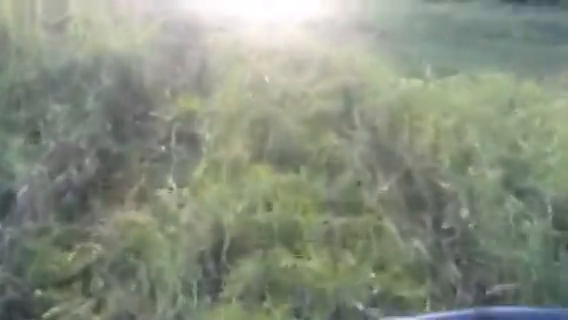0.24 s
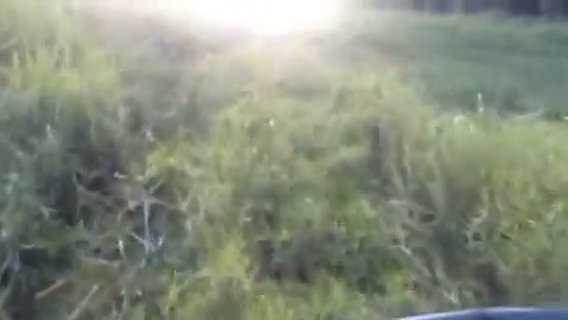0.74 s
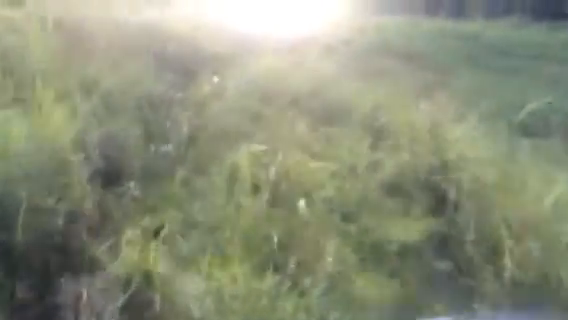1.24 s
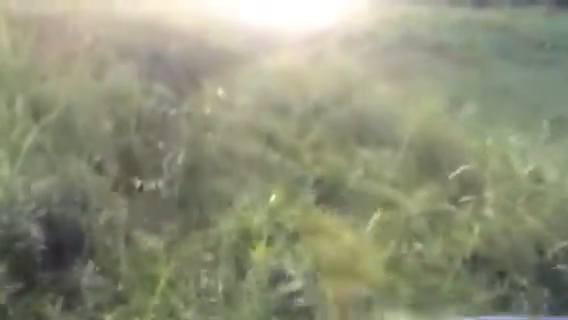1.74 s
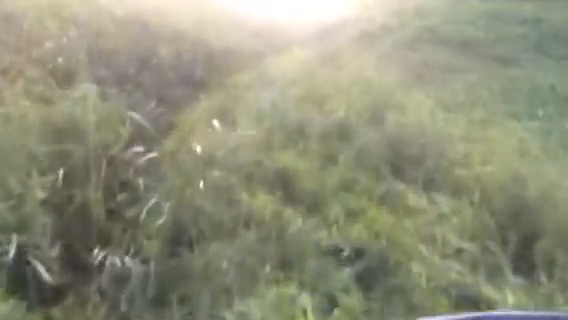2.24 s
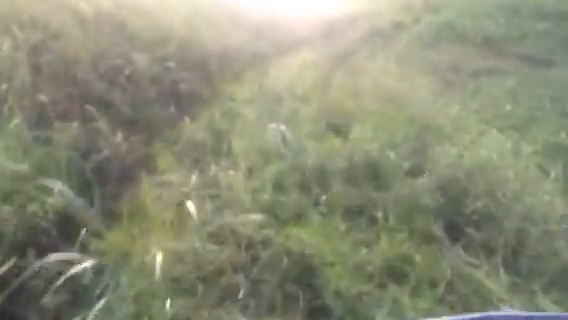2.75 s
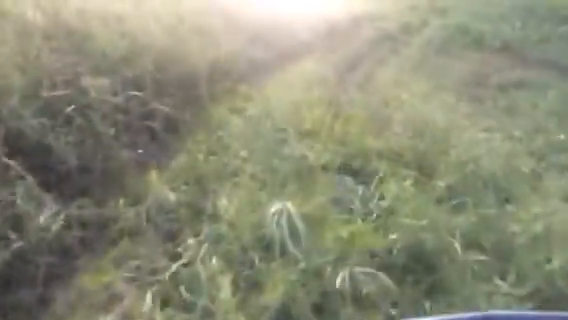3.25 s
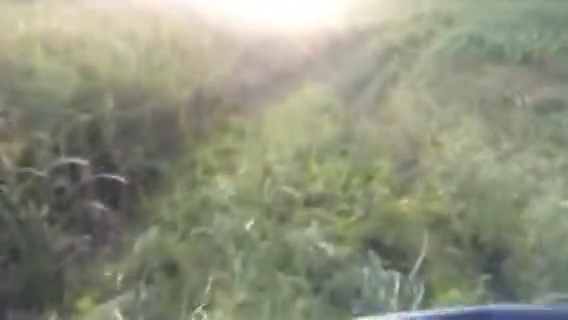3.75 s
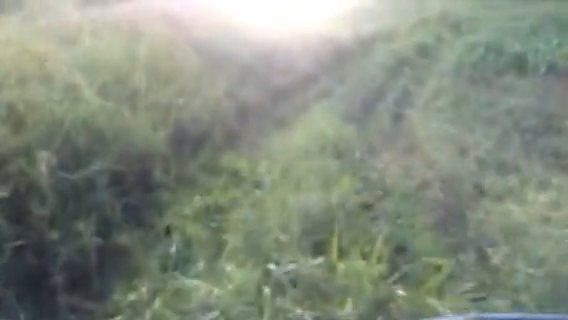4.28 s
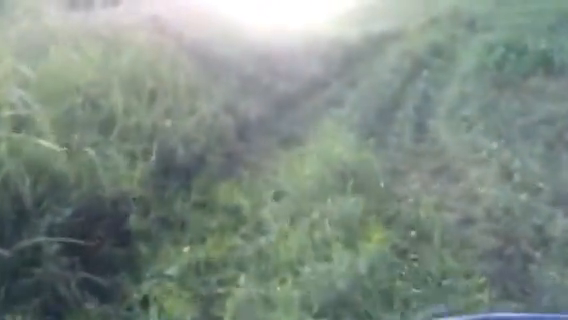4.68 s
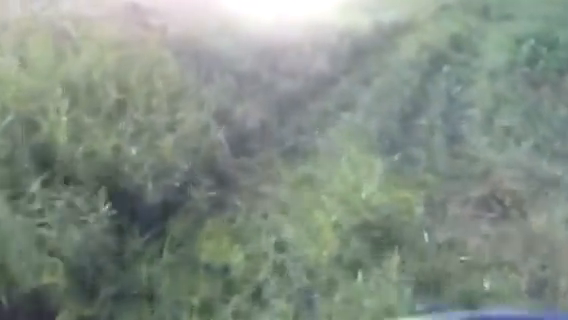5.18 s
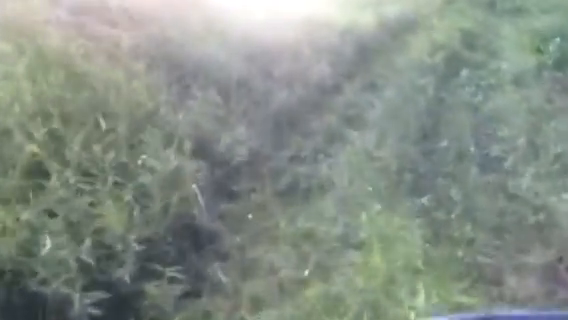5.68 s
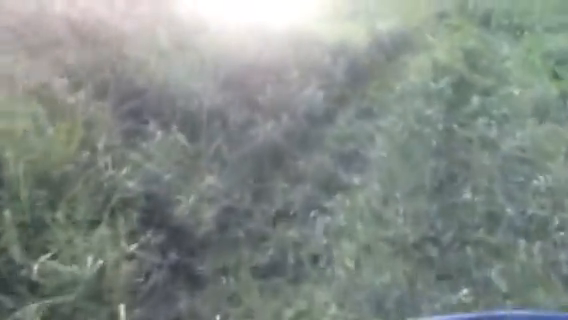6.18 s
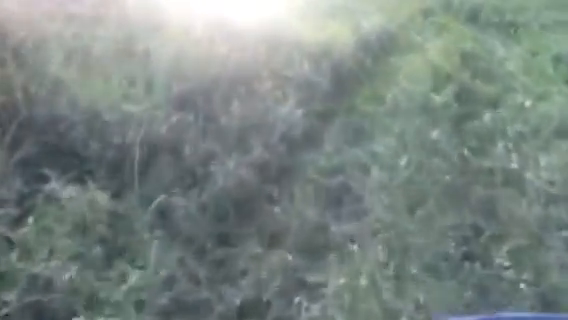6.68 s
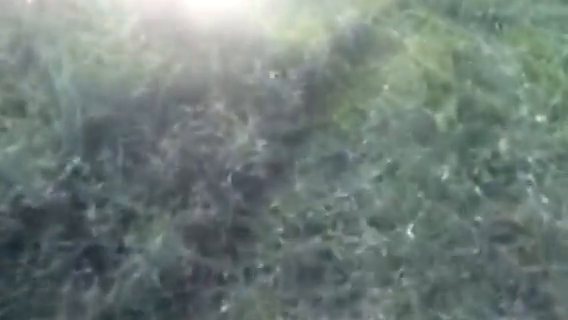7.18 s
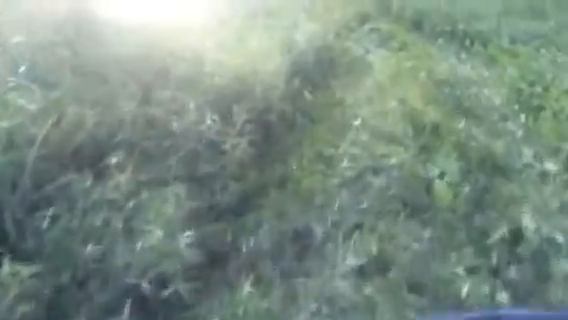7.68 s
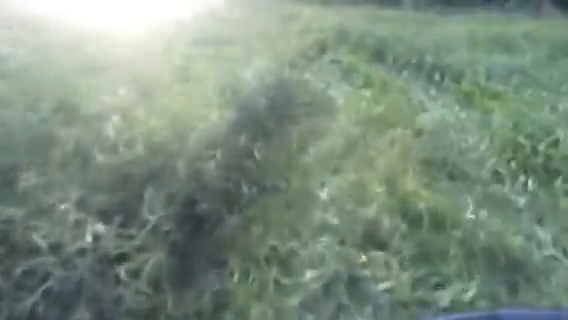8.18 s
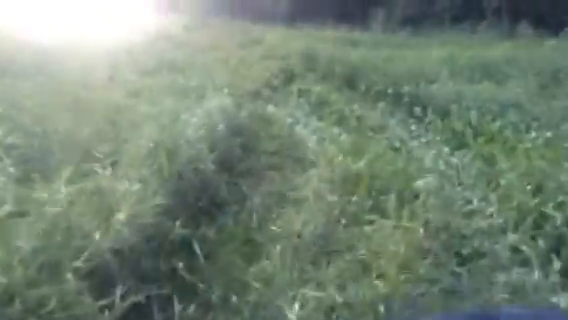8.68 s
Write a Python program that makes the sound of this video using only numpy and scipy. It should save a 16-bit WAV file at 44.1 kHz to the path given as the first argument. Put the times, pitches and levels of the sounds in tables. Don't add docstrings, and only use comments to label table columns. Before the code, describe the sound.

A single-cylinder off-road vehicle chugs steadily through tall grass, sagging briefly under load, with stalks hissing and snapping and one hard stone knock underneath.

```python
import sys
import numpy as np
from scipy import signal
from scipy.io import wavfile
from scipy.ndimage import uniform_filter1d

SR = 44100
rng = np.random.default_rng(int(sys.argv[2]) if len(sys.argv) > 2 else 0)


def unload_audio(sound):
    columns = np.transpose(np.atleast_2d(sound))
    steps = np.round(np.clip(columns, -1, 1) * 32767)
    wavfile.write(sys.argv[1], SR, steps.astype(np.int16))


def natural_amplitude(level_db):
    exponent = np.asarray(level_db, float) / 20
    return 10 ** exponent


N = 393813
T = np.arange(N) / SR


def evened(x):
    return x / np.sqrt(np.mean(x ** 2) + 1e-20)


def curves(rows, t=T):
    s, *columns = np.transpose(rows)
    return [np.interp(t, s, c) for c in columns]


def read(points, hz):
    f, value = np.transpose(points)
    return np.interp(np.log(hz + 1), np.log(f + 1), value)


def add(mix, s, sound):
    part = mix[round(s * SR):][:len(sound)]
    part += sound[:len(part)]


def resonate(x, hz, width_hz):
    r = np.exp(-np.pi * width_hz / SR)
    if np.ndim(hz) == 0:
        return 2 * signal.lfilter([1 - r], [1, -r * np.exp(2j * np.pi * hz / SR)], x).real
    turn = np.exp(2j * np.pi * np.cumsum(hz) / SR)
    return 2 * (turn * signal.lfilter([1 - r], [1, -r], x / turn)).real


def resonate_twice(x, hz, width_hz):
    return resonate(resonate(x, hz, width_hz), hz, width_hz)


def wander(rate_hz, count=1):
    steps = uniform_filter1d(rng.standard_normal((count, 2000)), max(int(110 / rate_hz), 1), axis=1)
    return [np.interp(T, np.linspace(0, T[-1], 2000), evened(s)) for s in steps]


def shaped_noise(spectrum, patchy_db, flicker_db, field_db=0):
    frames, hz = N // 256 + 5, np.fft.rfftfreq(1024, 1 / SR)
    a, b, patches = rng.standard_normal((frames, 513, 3)).T
    patches = uniform_filter1d(patches, size=14, axis=0)
    patches = evened(uniform_filter1d(patches, size=10, axis=1))
    flicker = evened(uniform_filter1d(rng.standard_normal(frames), size=4))
    level_db = read(spectrum, hz)[:, None] + patchy_db * patches + flicker_db * flicker + field_db
    z = (a + 1j * b) * natural_amplitude(level_db)
    return evened(signal.istft(z, nperseg=1024, noverlap=768)[1][512:N + 512])


# start_s, rate [firings per second]
ENGINE_SPEED = [(0.0, 19.227), (1.61, 19.08), (2.28, 18.789), (3.15, 18.068), (3.32, 16.192),
                (3.63, 17.321), (3.78, 16.51), (4.35, 16.617), (4.5, 17.038), (4.83, 16.748), (5.1, 17.918),
                (5.69, 17.665), (5.94, 18.938), (6.09, 18.568), (6.76, 18.822), (7.03, 19.787),
                (8.26, 19.347), (8.93, 19.357)]


def pace():
    return curves(ENGINE_SPEED)[0]


def crank():
    return np.cumsum(pace()) / SR


# order, free_running_db, lugging_db
ORDER_LEVELS = [(1, -59, -65.5), (2, -49, -55), (3, -53.5, -51), (4, -35, -42), (5, -22.5, -24.5),
                (6, -24, -26), (7, -36, -40), (8, -45, -31), (9, -43.5, -29.5), (10, -44.5, -34),
                (11, -48, -47.5), (12, -63, -43.5), (13, -66.5, -60.5), (14, -63.5, -50), (15, -57, -68.5),
                (16, -61, -71), (17, -59, -66.5), (18, -68.5, -58), (19, -55.5, -60.5)]
PACE, LOAD = (16.13, 19.41, 19.6), (1, -0.086, 0.038)
# order, lugging_db, cruising_db, pulling_away_db, sway_db
LOUD_ORDERS = [(4, -40.5, -35, -32, 1.7), (5, -28, -24.5, -25.5, -1.3), (6, -25.5, -22.5, -23, 0.14),
               (7, -41.5, -38.5, -34, 3.5), (8, -30.5, -49, -48, 2.1), (9, -31.5, -47.5, -42.5, 1.5),
               (11, -53, -48, -46, 3)]
# middle_s, half_length_s, loss_db
WEAK_FIRINGS = [
    (2.44, 0.045, -1.5),
    (3.24, 0.15, -6),
    (3.75, .07, -2.5),
    (6.066, .05, -0.5),
]
FIRING_TURNS, START_TURNS = -.05, .48
PIPE_NULL, NULL_TURNS = 9.35, .086
ROCK_TURNS, MUFFLER_TURNS = -1 / 3, .18
CHOP, GAP_TURNS, LUG_LAG_TURNS = .6, .56, .045


def order_lags():
    order, free_db, lugged_db = np.transpose(ORDER_LEVELS)
    log_gain = np.interp(np.arange(33), order, (free_db + lugged_db) / 2) * np.log(10) / 20
    lag = -signal.hilbert(np.r_[log_gain, log_gain[-2:0:-1]]).imag / (2 * np.pi)
    lag += NULL_TURNS / (np.arange(64) - PIPE_NULL)
    lag += np.arange(64) * (FIRING_TURNS - lag[6] + lag[5])
    lag += START_TURNS + 5 * FIRING_TURNS - lag[5]
    lag[4] += ROCK_TURNS
    lag[7:11] -= MUFFLER_TURNS * np.minimum(np.arange(1, 5) / 3, 1)
    return lag


def exhaust():
    lag = order_lags()
    load = np.interp(pace(), PACE, LOAD)
    loss_db = sum(db * np.exp(-((T - s) / half_s) ** 4) for s, half_s, db in WEAK_FIRINGS)
    turns, out = crank(), np.zeros(N)
    loud = {}
    for k, *dbs, sway_db in LOUD_ORDERS:
        loss_share = 1 if k < 8 else .6
        loud[k] = (np.interp(pace(), PACE, dbs) + loss_share * loss_db, sway_db)
    sways, slips = wander(4.2, count=19), wander(6, count=19)
    for (k, free, lugged), sway, slip in zip(ORDER_LEVELS, sways, slips):
        level_db, sway_db = loud.get(k, (free + (lugged - free) * load + 0.4 * loss_db, 2.5))
        level_db = level_db + sway_db * sway
        slip_turns = (.008 if k in (5, 6) else .03) * slip
        phase = k * turns + lag[k] - (k == 5) * LUG_LAG_TURNS * load + slip_turns
        out += natural_amplitude(level_db) * np.cos(2 * np.pi * phase)
    charge = rng.standard_normal(200)[(turns + .45).astype(int)]
    uneven_db = (.7 + .5 * np.clip(load, 0, 1)) * uniform_filter1d(charge, size=500)
    chop_db = CHOP * (loss_db - 2 * load) * np.cos(2 * np.pi * (turns - GAP_TURNS))
    return np.sqrt(2) * out * natural_amplitude(uneven_db + chop_db)


# frequency_hz, density [dB per Hz]
ROAR_SPECTRUM = [(12, -26), (28, -6.5), (52, 0.5), (85, -2.5), (200, -10.5), (260, -19), (400, -22),
                 (900, -25.5), (1200, -28), (2000, -34.5), (3500, -39), (6500, -39), (8800, -47.5),
                 (15500, -67)]
# frequency_hz, width_hz, level_db
BODY_PANELS = [(125, 16, -41), (335, 60, -56), (1090, 40, -59), (1340, 90, -64), (1710, 90, -66),
               (2600, 140, -69), (3750, 900, -63), (6200, 1100, -63)]
# frequency_hz, gain [dB per firing a second], share of the grass level [ratio]
ROAR_TRACKING = [
    (40, -0.1, .01),
    (700, 0.27, .02),
    (5000, 0.12, 0.14),
]
ROAR_DB = -33.5


def roar():
    frame_t, hz = np.arange(N // 256 + 5) * 256 / SR, np.fft.rfftfreq(1024, 1 / SR)
    octave = np.log2(hz[:, None] + 1)
    tracks = curves(ENGINE_SPEED, frame_t) + curves(GRASS_LEVEL, frame_t)
    speed, thick = (c - np.median(c) for c in tracks)
    field_db = sum((gain_db * speed + share * thick) * np.exp(-((octave - np.log2(f)) / 1.1) ** 2)
                   for f, gain_db, share in ROAR_TRACKING)
    wide = natural_amplitude(ROAR_DB) * shaped_noise(ROAR_SPECTRUM, patchy_db=0.84, flicker_db=0.38, field_db=field_db)
    wide = signal.sosfilt(signal.butter(4, 30, "high", fs=SR, output="sos"), wide)
    white = rng.standard_normal(N)
    rings = np.zeros(N)
    for (f, width, db), sway in zip(BODY_PANELS, wander(1.5, count=8)):
        sway_db = 2.3 * sway * (width < 500)
        rings += natural_amplitude(db + sway_db) * evened(resonate_twice(white, f, width))
    return (wide + rings) * natural_amplitude(.55 * np.cos(2 * np.pi * (crank() - .1)))


# start_s, pitch_hz, level_db
GEAR_MESH = [(0, 1000, -60), (1.2, 982, -54.5), (1.6, 970, -55), (2.3, 978, -57.5), (2.7, 963, -51.5),
             (3.2, 939, -55), (3.35, 917, -75), (3.6, 898, -55), (3.8, 835, -53), (4.2, 814, -56.5),
             (4.7, 787, -61), (6.0, 790, -65), (6.7, 823, -61), (7.1, 882.5, -51), (7.5, 923, -53),
             (8, 951, -55.5), (8.5, 942, -53), (8.93, 924, -53)]
# start_s, length_s, first_hz, last_hz, top_db
BELT_HUMS = [
    (.1, 1.8, 38, 40, -41),
    (1.9, 1.7, 44, 55, -38),
    (0, 1.9, 18, 20, -46),
    (1.9, 1.4, 24, 36, -43),
    (3.85, .7, 1105, 1030, -57),
    (5.0, .9, 41, 43, -41),
    (5.9, 1.1, 30, 26, -45),
    (6.8, 1.5, 53, 50, -41),
]
SECOND_GEAR, SECOND_DB, SECOND_FADE_DB_PER_S = .672, 1.2, -2.0
WAVER, BREAKUP_DB = .0035, 1.6


def whine():
    out = np.zeros(N)
    mesh_hz, mesh_db = curves(GEAR_MESH)
    wobble, grip = wander(7, count=2)
    mesh_hz = mesh_hz * (1 + WAVER * wobble)
    mesh_db = mesh_db - 1.5 + BREAKUP_DB * grip
    second_db = mesh_db + SECOND_DB + SECOND_FADE_DB_PER_S * T
    lines = [(0, mesh_hz, mesh_db), (0, SECOND_GEAR * mesh_hz, second_db)]
    for s, length, first_hz, last_hz, db in BELT_HUMS:
        u = np.arange(0, 1, 1 / (length * SR))
        lines.append((s, first_hz + (last_hz - first_hz) * u, db - 9 * (2 * u - 1) ** 2))
    for s, hz, level_db in lines:
        fuzzy = evened(resonate(rng.standard_normal(len(hz)), hz, .009 * hz[0] + 1.5))
        clean = np.sqrt(2) * np.sin(2 * np.pi * np.cumsum(hz) / SR)
        edges = signal.windows.tukey(len(hz), .03)
        add(out, s, natural_amplitude(level_db) * (0.68 * clean + 0.69 * fuzzy) * edges)
    return out


# start_s, level_db, rise_s, rebound_delay_s, rebound_db
STONE_BLOWS = [
    (4.814, -3.3, .006, .02, -24),
    (4.9725, -17, .006, .008, -12),
    (5.0578, -15.5, .002, .011, -12),
]
# frequency_hz, level_db, t60_s
CHASSIS_MODES = [
    [(135, -14, .12), (172, 0, .13), (246, -11, .14), (410, -21, .07), (580, -20, .07), (700, -24, .06),
     (1000, -38, .06)],
    [(185, 0, .08), (300, -14, .06), (900, -40, .05), (1550, -36, .05)],
    [(370, -13, .06), (530, -2, .045), (610, 0, .05), (800, -14, .03), (1040, -11, .05), (1290, -24, .03),
     (1650, -22, .035), (2490, -24, .03)],
]


def knocks():
    out, t = np.zeros(N), T[:9000]
    for (s, db, rise, delay, rebound_db), modes in zip(STONE_BLOWS, CHASSIS_MODES):
        ring = -sum(natural_amplitude(m_db - 60 * t / t60) * np.sin(2 * np.pi * hz * t) for hz, m_db, t60 in modes)
        rattle = evened(resonate_twice(rng.standard_normal(len(t)), 900, 1200))
        rattle = rattle * natural_amplitude(-41 - db - 60 * t / .25)
        blow = (ring + rattle) * (1 - np.exp(-t / rise))
        add(out, s, natural_amplitude(db) * blow)
        add(out, s + delay, natural_amplitude(db + rebound_db) * blow)
    return out


# start_s, level_db
GRASS_LEVEL = [(0.0, -58.5), (0.42, -57.5), (0.92, -63), (1.74, -60.5), (2.0, -55), (2.59, -54.5),
               (2.98, -62), (3.21, -60), (3.36, -56.5), (3.58, -61), (4.18, -61), (4.8, -62.5), (5.02, -62),
               (5.27, -56), (5.69, -61.5), (5.97, -65.5), (7.36, -68.5), (8.93, -64)]
# frequency_hz, density [dB per Hz]
STALK_SPECTRUM = [(1500, -30), (4000, -10), (7000, -3.5), (10000, -2.5), (15500, -2.5)]
# start_s, peak_db, centre_hz, decay_s
STALK_SNAPS = [(1.2605, -34, 7000, .012), (1.2815, -33, 7000, .012), (1.365, -37, 6500, .01),
               (1.448, -36, 8000, .008), (1.4891, -29, 6160, 0.024), (1.6623, -30, 7000, 0.0074),
               (1.6826, -31, 7000, .02), (1.7883, -31, 6500, .02), (1.858, -30.5, 12600, .03),
               (3.04, -38, 9000, .015), (3.743, -34, 6400, .012), (3.844, -33, 6000, 0.013),
               (3.906, -33, 6400, .015), (4.024, -35, 6500, .012), (4.116, -36, 7000, .012),
               (4.204, -38, 6000, 0.011), (5.021, -36, 8000, 0.014), (5.288, -35, 8500, 0.049),
               (5.345, -35, 8000, .02), (6.95, -39, 10550, .04), (7.058, -48, 12500, .02),
               (7.933, -37, 7500, .02), (8.609, -42, 13500, .05), (8.618, -46, 14500, .04)]
# start_s, peak_db, centre_hz, decay_s; then its width as a share of the centre
PING, PING_SPREAD = (.4686, -26.8, 2950, .003), .17
SNAP_SPREAD, NARROW_HZ = .75, 16500


def grass():
    size = natural_amplitude(2.0 * np.minimum(rng.exponential(1, N), 4)) * (rng.random(N) < 900 / SR)
    crackle = signal.oaconvolve(size, np.exp(-T[:400] / 0.0021))[:N]
    hiss = shaped_noise(STALK_SPECTRUM, patchy_db=0.5, flicker_db=1.24)
    out = natural_amplitude(curves(GRASS_LEVEL)[0] + 6.5) * evened(hiss * (1 + 0.34 * evened(crackle)))
    grit, t = rng.standard_normal((len(STALK_SNAPS) + 1, 2500)), T[:2500]
    for (s, db, hz, t60), noise in zip([PING] + STALK_SNAPS, grit):
        spread = PING_SPREAD if s == PING[0] else min(SNAP_SPREAD, 1.2 * (NARROW_HZ / hz - 1))
        crack = 3.5 * (t == 0) + noise * natural_amplitude(-60 * t / (2 * t60))
        snap = resonate(resonate(crack, hz, spread * hz), hz, 2 * spread * hz)
        snap = snap + .05 * np.diff(crack, prepend=0)
        add(out, s, natural_amplitude(db) * snap / abs(snap).max())
    return out


# start_s, end_s, first_db, last_db
BUZZ_BOUTS = [
    (-.1, .62, -61, -55),
    (.75, 1.83, -57, -47.5),
    (1.852, 2.066, -46, -44.5),
    (2.07, 2.8, -54, -71.5),
    (3.086, 4.1, -57, -66),
]
# start_s, level_db
TRILL_LEVEL = [(2.4, -68), (4.3, -68), (5.1, -71), (7.6, -72)]
# start_s, level_db, pitch_hz
CHIRP_CALLS = [
    (5.81, -51, 14700),
    (6.988, -56.5, 14600),
    (8.23, -54, 14600),
]
BUZZ_HZ, BUZZ_PER_S, BOUT_EDGE_S = 13500, 43.6, .012


def insects():
    white, out = rng.standard_normal(N), np.zeros(N)
    strokes = np.cumsum(BUZZ_PER_S * (1 + .01 * wander(8)[0])) / SR
    buzz = evened(resonate_twice(white, BUZZ_HZ, 3600) * natural_amplitude(5.2 * np.cos(2 * np.pi * strokes)))
    for s, end, first_db, last_db in BUZZ_BOUTS:
        edges = np.clip(np.minimum(T - s, end - T) / BOUT_EDGE_S, 0, 1)
        out += natural_amplitude(np.interp(T, (s, end), (first_db, last_db)) - 3.5) * edges * buzz
    trill = evened(resonate_twice(white, 8140, 300))
    trill_db = curves(TRILL_LEVEL)[0] + 2.5 + 2.0 * wander(1.6)[0]
    out += natural_amplitude(trill_db) * trill * np.clip(np.minimum(T - 2.4, 7.6 - T) / 0.46, 0, 1)
    t = T[:1600] - .018
    for s, db, hz in CHIRP_CALLS:
        envelope = np.exp(-(t / .011) ** 2) * (1 + .4 * np.cos(2 * np.pi * 90 * t))
        add(out, s - .018, natural_amplitude(db) * envelope * np.sin(2 * np.pi * hz * t))
    return out


def scene():
    return (exhaust() + roar() + whine() + grass() + insects() + knocks())[None]


def roll_off(x):
    return signal.sosfilt(signal.butter(12, 15430, fs=SR, output="sos"), x)


def record(dry):
    edge = signal.firwin(1023, 15420, window=("kaiser", 7), fs=SR)
    mix = signal.oaconvolve(dry, edge[None], "same")
    return roll_off(mix)


dry = scene()
out = record(dry)
unload_audio(out)
```